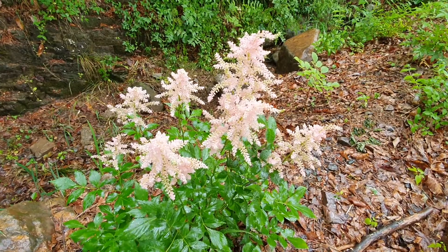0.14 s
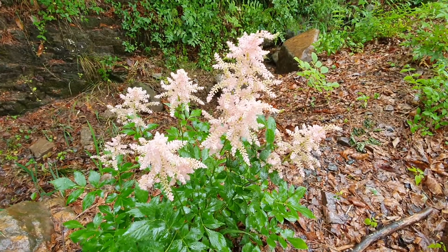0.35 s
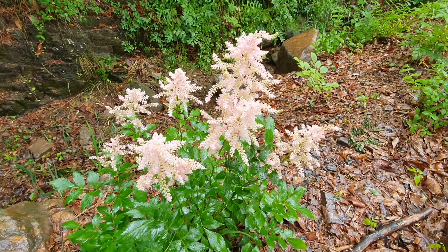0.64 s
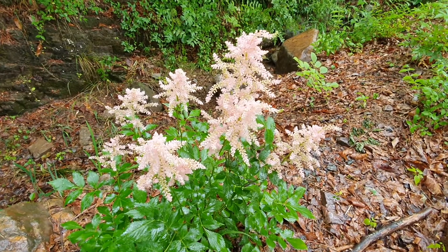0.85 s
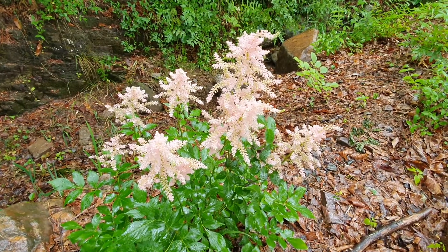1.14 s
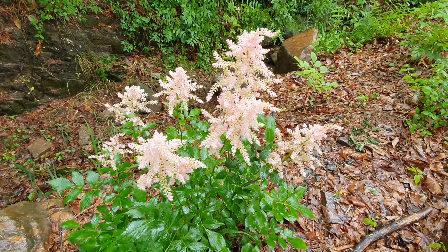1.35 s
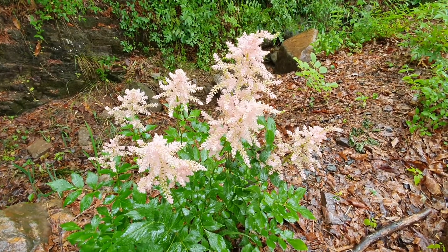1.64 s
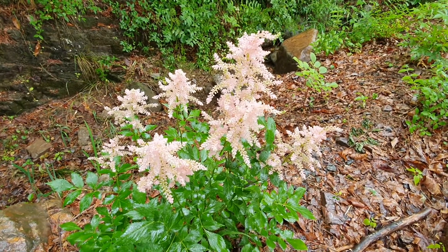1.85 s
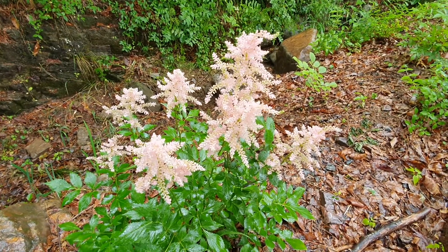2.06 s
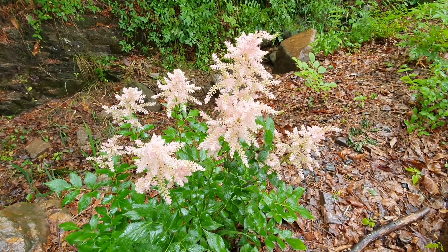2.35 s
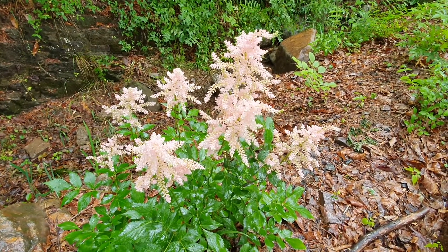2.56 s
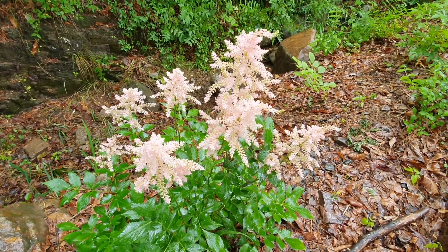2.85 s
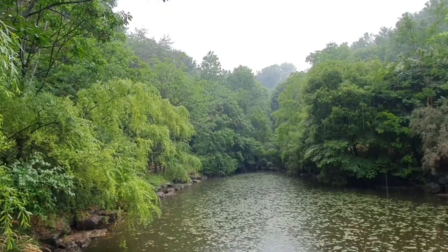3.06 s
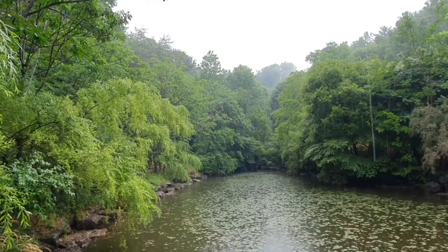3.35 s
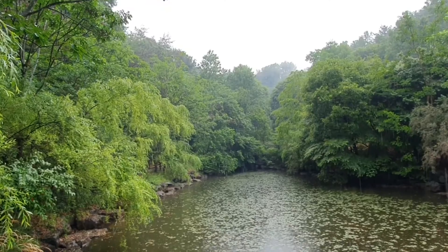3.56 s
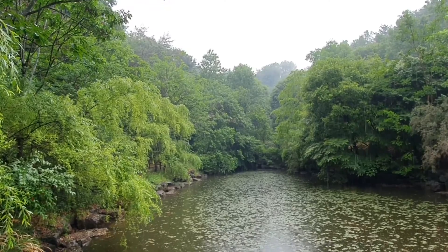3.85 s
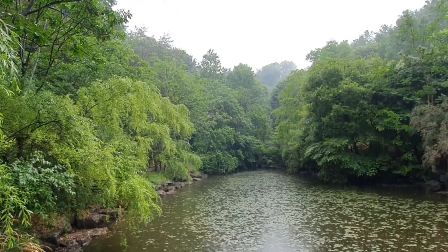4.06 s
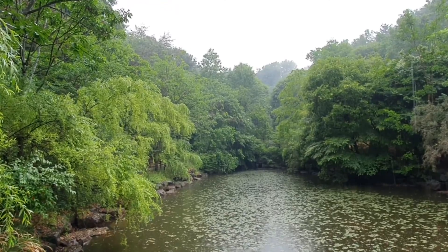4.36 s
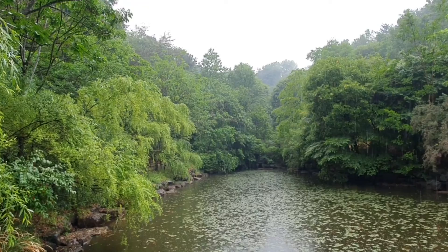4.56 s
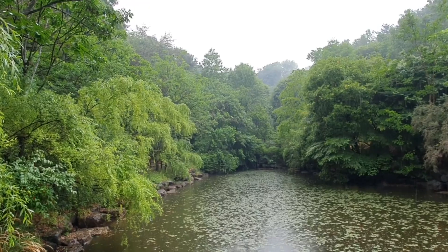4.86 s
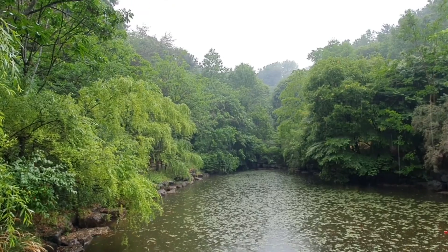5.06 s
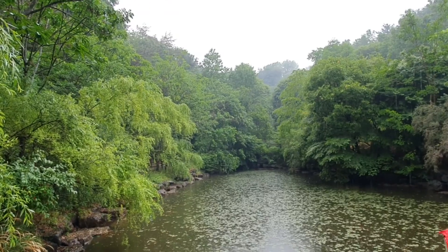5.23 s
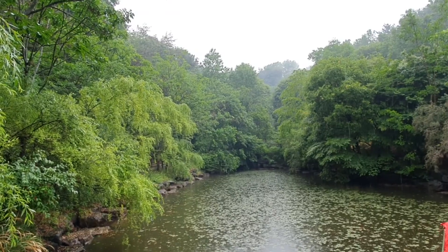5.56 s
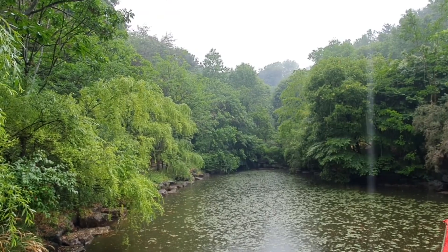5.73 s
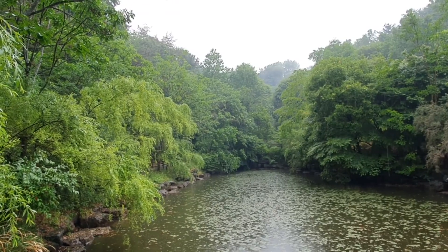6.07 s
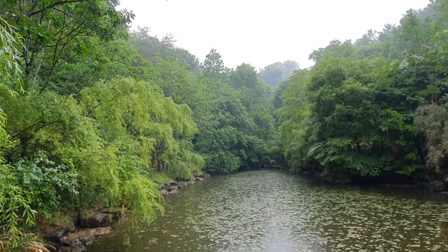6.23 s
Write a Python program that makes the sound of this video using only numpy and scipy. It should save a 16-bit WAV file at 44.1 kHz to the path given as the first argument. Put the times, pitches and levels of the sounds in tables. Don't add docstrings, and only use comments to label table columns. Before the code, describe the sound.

Steady rain in a wooded valley with a pond: a wide soft hush with a low distant rumble and fine canopy hiss. Faint patter fills the middle distance. Close drops tick crisply on leaves and tap wet litter, mostly right of centre, busiest until about two seconds, then sparser and irregular to the end. Stereo microphone stands still among the trees.

```python
import sys
import numpy as np
from scipy import signal
from scipy.fft import rfft, irfft, next_fast_len
from scipy.io import wavfile
from scipy.ndimage import uniform_filter1d, map_coordinates

SR = 44100
rng = np.random.default_rng(int(sys.argv[2]) if len(sys.argv) > 2 else 0)


def output_pcm(signal):
    pcm = np.clip(np.atleast_2d(signal).T, -1, 1) * 32767
    wavfile.write(sys.argv[1], SR, np.round(pcm).astype(np.int16))


def boost_factor(decibels):
    exponent = np.asarray(decibels, float) / 20
    return 10 ** exponent


N = 282240

# t/s, level/dB
RAIN_STRENGTH = [
    (0.0, -37),
    (0.39, -38),
    (1.5, -37),
    (1.62, -37),
    (2.62, -37.5),
    (4.78, -38),
    (4.92, -37),
    (5.37, -38),
    (6.4, -37.5),
]
# t/s, peak level/dB, ring f/Hz, left over right level/dB
BROAD_LEAF_DROPS = [(0.351, -34, 4960, -5), (0.6501, -16, 4570, -2), (0.6667, -35, 4370, -13),
                    (0.9407, -31.5, 3880, 6.5), (1.0428, -22, 4290, -4), (1.0895, -21.5, 3540, -10),
                    (1.3972, -29, 4260, -2.5), (1.4529, -16, 3440, -3.5), (1.6016, -37, 4130, -14),
                    (1.7335, -19.5, 4160, -5.5), (1.7661, -20.5, 3670, -13.5), (1.848, -35, 3640, -17),
                    (1.9765, -34, 3950, -7), (2.019, -33.5, 3350, -10), (3.1246, -26.5, 3820, -10.5),
                    (3.322, -26.5, 5300, 6), (3.4525, -33, 3540, -5.5), (3.8695, -36.5, 3230, -7),
                    (4.0094, -27.5, 4940, -0.5), (4.3849, -22.5, 3560, 4), (4.4246, -31.5, 4440, -13),
                    (4.7026, -36, 4180, -15), (4.755, -24, 4900, -7), (3.8697, -26.5, 4650, -6.5),
                    (5.2491, -29.5, 3840, -5.5), (5.7404, -30, 4570, -10.5), (6.1946, -21.5, 4400, -6),
                    (6.3022, -39.5, 3790, -5)]
# t/s, peak level/dB, ring f/Hz, left over right level/dB
SMALL_LEAF_DROPS = [(0.1698, -35, 6450, -11), (0.3509, -22.5, 6030, -1.5), (0.6508, -21.5, 6140, -6),
                    (1.0427, -24.5, 6980, -8), (1.0905, -24.5, 5590, -13.5), (1.4529, -31, 5780, -6.5),
                    (1.4881, -16.5, 5900, -4), (1.4884, -20.5, 7200, -4.5), (3.1244, -28, 5540, -8.5),
                    (1.6073, -20.5, 5760, -11.5), (1.6299, -29, 5500, -6.5), (1.7333, -24, 6120, -4),
                    (1.766, -27, 5540, -17), (1.7666, -16.5, 6400, -2.5), (1.7945, -28.5, 5780, -5),
                    (1.9767, -24.5, 6180, -4), (2.019, -26.5, 6170, -3.5), (2.1371, -39, 5980, -17),
                    (3.3221, -27, 5350, 0.5), (3.8696, -25.5, 5430, -15), (4.0095, -22.5, 6430, -0.5),
                    (4.437, -39, 6660, 1.5), (4.7026, -32, 6800, -9.5), (4.7645, -25, 6300, -5),
                    (4.7954, -34.5, 5820, -8.5), (5.2792, -22, 6850, -2.5), (5.7299, -32, 5920, -10.5),
                    (5.8482, -25, 7150, -1.5), (5.8552, -23, 6420, -6), (6.1948, -22, 6100, -3)]
# t/s, peak level/dB, ring f/Hz, left over right level/dB
WET_LITTER_DROPS = [
    (0.6502, -29, 3030, 3),
    (0.9406, -38, 2830, -8.5),
    (1.042, -29, 2860, -7),
    (1.4525, -31, 3090, 2.5),
    (1.7654, -29.5, 2360, -5.5),
    (3.0572, -37.5, 2380, -13.5),
    (3.8689, -37, 2950, -12.5),
    (4.7711, -34.5, 3150, -10.5),
    (6.1935, -35, 2650, -10),
]
# t/s, peak level/dB, ring f/Hz, left over right level/dB
SOFT_GROUND_DROPS = [(1.5922, -29, 1143, 2.5), (1.9671, -30.5, 1014, -4.5), (2.0537, -26, 1090, -4.5),
                     (2.1341, -36.5, 1000, -6.5), (2.1414, -27.5, 926, 2.5), (2.3898, -33, 1064, -5),
                     (4.7712, -29.5, 1713, -11.5), (4.8436, -30, 1260, -6.5), (5.8546, -28.5, 1205, 3),
                     (4.8436, -29.5, 456, -1.5), (4.844, -31.5, 2300, -12.5)]
# f/Hz, level per Hz/dB
RUMBLE_SPECTRUM = [(8, -33), (20, -1.5), (60, -0.5), (140, -0.5), (260, -12), (600, -73)]
# f/Hz, level per Hz/dB
VALLEY_SPECTRUM = [(80, -43.5), (170, -3.5), (330, -1), (450, -3), (790, -3), (1100, -2), (1500, -5),
                   (1900, -11.5), (3000, -19), (6000, -65.5)]
# f/Hz, level per Hz/dB
HISS_SPECTRUM = [(800, -37), (1700, -2.5), (2400, -1), (3500, -1.5), (5700, -4.5), (7300, -5.5), (7480, -8),
                 (7540, -70)]
# f/Hz, correlation/1
PORT_LIKENESS = [(60, .72), (200, 0.76), (500, 0.47), (1000, 0.74), (1550, 0.42), (2200, 0.22),
                 (2900, 0.074), (4200, -0.088), (6000, 0.15), (7000, -0.012)]
# f/Hz, left over right level/dB
PORT_TILT = [(30, 0), (250, -3), (800, 0.1), (3000, 0.1), (6000, -0.7)]
# f/Hz, level/dB
TREBLE_END = [(7600, -0.5), (7700, -26), (8300, -18.5), (8700, -66), (12000, -90)]

RUMBLE_DB, VALLEY_DB, HISS_DB = -47, -37.5, -40.5
RUMBLE_GROWS, VALLEY_GROWS, HISS_GROWS = 1.2, 0.92, 0.9
PORT_LAG_MS = 0.12
LAG_PAN_DB = 3
LOUD_DROP_DB = -19.5
SPLASH_GROWS = 0.6


def along(points, hz):
    f, value = np.transpose(points)
    return np.interp(np.log(hz + 1), np.log(f + 1), value)


def unit(x):
    return x / np.sqrt(np.mean(x ** 2) + 1e-20)


def wobble(rate):
    knots = rng.standard_normal(int(N * 40 / SR) + 4)
    return map_coordinates(knots, [np.arange(N) * min(rate, 40) / SR])


def filtered(x, response):
    m = next_fast_len(N + 8192)
    return irfft(rfft(x, m) * response(np.fft.rfftfreq(m, 1 / SR)), m)[..., :N]


def rush(spectrum, patchy_db):
    z = signal.stft(rng.standard_normal((2, N)), nperseg=512)[2]
    field = uniform_filter1d(rng.standard_normal(z.shape[1:]), size=6, axis=0)
    field = uniform_filter1d(field, size=5, axis=1)
    pair = signal.istft(z * boost_factor(patchy_db * unit(field)), nperseg=512)[1][:, :N]

    def mid_side_response(hz):
        turn = np.arccos(np.clip(along(PORT_LIKENESS, hz), -1, 1)) / 2
        return boost_factor(along(spectrum, hz)) * [np.cos(turn), np.sin(turn)]

    mid, side = filtered(pair, mid_side_response)
    return unit(np.array([mid + side, mid - side]))


def hush():
    s, strength_db = np.transpose(RAIN_STRENGTH)
    swell_db = np.interp(np.arange(N) / SR, s, strength_db - strength_db.mean())
    rumble_db = RUMBLE_DB + RUMBLE_GROWS * swell_db
    valley_db = VALLEY_DB + VALLEY_GROWS * swell_db
    hiss_db = HISS_DB + HISS_GROWS * swell_db
    gust = wobble(9.2)
    rumble = boost_factor(rumble_db + 0.3 * gust) * rush(RUMBLE_SPECTRUM, patchy_db=1.54)
    valley = boost_factor(valley_db + 0.095 * gust + 0.2 * wobble(9)) * rush(VALLEY_SPECTRUM, patchy_db=0.77)
    hiss = boost_factor(hiss_db + 0.068 * gust + 0.51 * wobble(6.2)) * rush(HISS_SPECTRUM, patchy_db=1.75)
    return filtered(rumble + valley + hiss, lambda hz: boost_factor(along(PORT_TILT, hz) * [[0.5], [-0.5]]))


def ticks(s, db, hz, pan_db, lag_ms, cycles, rise_ms, size):
    out = np.zeros((2, N))
    first = np.floor(s * SR).astype(int) - 8
    where = np.clip(first[:, None] + np.arange(size), 0, N - 1)
    for port, side in enumerate((0.5, -0.5)):
        arrival = s + side * lag_ms / 1000
        t = np.maximum(where / SR - arrival[:, None], 0)
        rise = (1 - np.exp(-t / rise_ms * 1000)) ** 2
        shape = rise * boost_factor(-60 * t * hz[:, None] / cycles)
        shape = shape / shape.max(1, keepdims=True).clip(1e-9)
        ring = shape * np.sin(2 * np.pi * hz[:, None] * t)
        level = boost_factor(db + side * pan_db)[:, None]
        out[port] = np.bincount(where.ravel(), (level * ring).ravel(), N)
    return out


def patter(count, db, spread_db, hz, scatter, cycles):
    u, g = rng.random((count, 3)), rng.standard_normal((count, 2))
    size_db = db - spread_db * np.log(u[:, 1] + 0.057)
    side = 2 * u[:, 2] - 1.2
    pitch = np.clip(hz * np.exp(scatter * g[:, 0]), 400, 6800)
    return ticks(u[:, 0] * N / SR, size_db, pitch, 6 * side, -0.16 * side, cycles, 0.076, size=160)


def near_drops(rows, cycles, rise_ms, ring_db, splash_db, splash_t60, width):
    s, db, hz, pan_db = np.transpose(rows)
    lag_ms = -PORT_LAG_MS * np.tanh(pan_db / LAG_PAN_DB)
    spray_db = SPLASH_GROWS * (db - LOUD_DROP_DB)
    out = ticks(s, db + ring_db, hz, pan_db, lag_ms, cycles, rise_ms, size=700)
    t, f = np.arange(2048) / SR, np.fft.rfftfreq(2048, 1 / SR)
    for k in range(len(s)):
        colour = 1 / (1 + (np.log((f + 1) / hz[k]) / width) ** 4)
        spray = irfft(rfft(rng.standard_normal((2, 2048))) * colour)
        burst = unit(spray) * boost_factor(-60 * t / splash_t60)
        burst *= boost_factor(spray_db[k] + splash_db + pan_db[k] * np.array([[0.3], [-0.3]]))
        span = out[:, round(s[k] * SR):][:, :2048]
        span += burst[:, :span.shape[1]]
    return out


def scene():
    leaves = patter(count=1500, db=-49.0, spread_db=4.5, hz=4320, scatter=0.3, cycles=14)
    soil = patter(count=500, db=-43, spread_db=0.5, hz=1291, scatter=0.4, cycles=7)
    sprigs = patter(count=60, db=-43, spread_db=1.0, hz=5700, scatter=0.17, cycles=17)
    broad = near_drops(BROAD_LEAF_DROPS, cycles=24, rise_ms=0.16, ring_db=-1.0,
                       splash_db=-32, splash_t60=0.055, width=0.35)
    small = near_drops(SMALL_LEAF_DROPS, cycles=29, rise_ms=0.25, ring_db=-3.0,
                       splash_db=-32.5, splash_t60=0.046, width=0.2)
    litter = near_drops(WET_LITTER_DROPS, cycles=12, rise_ms=0.32, ring_db=-1.5,
                        splash_db=-28, splash_t60=0.043, width=0.15)
    ground = near_drops(SOFT_GROUND_DROPS, cycles=8.2, rise_ms=0.12, ring_db=3.5,
                        splash_db=-32.5, splash_t60=0.068, width=0.51)
    return hush() + leaves + soil + sprigs + broad + small + litter + ground


def top_cut(x):
    return signal.sosfilt(signal.butter(12, 8100, fs=SR, output="sos"), x)


def record(dry):
    limited = filtered(dry, lambda hz: boost_factor(along(TREBLE_END, hz)))
    return top_cut(limited)


dry = scene()
out = record(dry)
output_pcm(out)
```